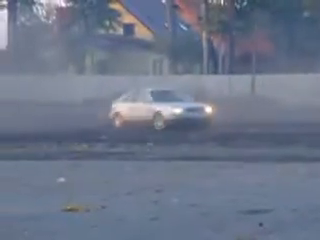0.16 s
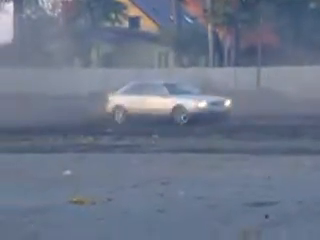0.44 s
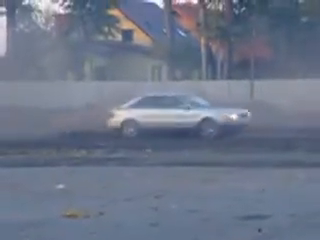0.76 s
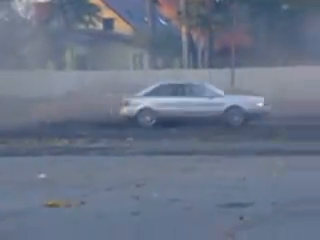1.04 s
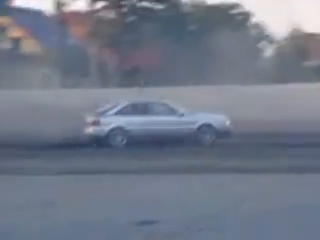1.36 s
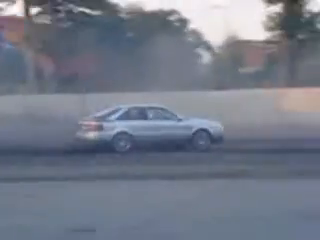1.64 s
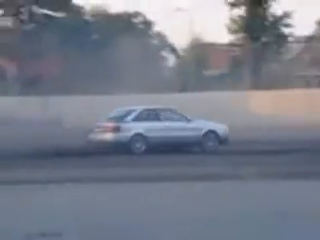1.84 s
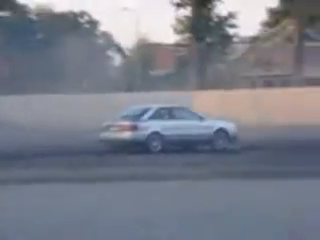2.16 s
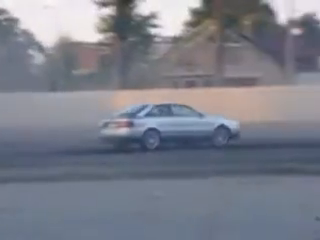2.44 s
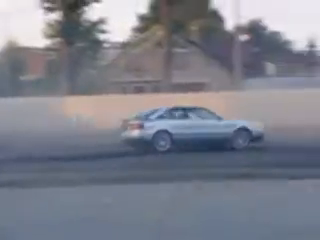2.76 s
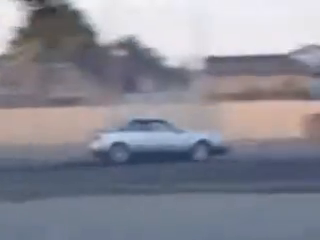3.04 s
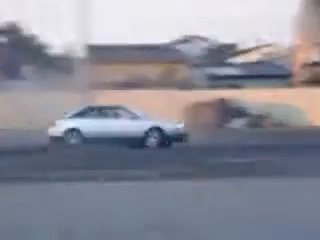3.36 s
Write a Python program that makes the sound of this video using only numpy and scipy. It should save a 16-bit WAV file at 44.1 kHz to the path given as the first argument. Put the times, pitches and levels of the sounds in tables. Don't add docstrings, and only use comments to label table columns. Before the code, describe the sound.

A car drifts on loose gravel outdoors, tyres roaring and ringing, stones hissing, engine revving in short stabs; a gentle wind boom midway, then stones knock the wheel arch. Mono camera microphone, fairly close.

```python
import sys
import numpy as np
from scipy import signal
from scipy.fft import rfft, irfft
from scipy.io import wavfile
from scipy.ndimage import uniform_filter1d

SR = 44100
rng = np.random.default_rng(int(sys.argv[2]) if len(sys.argv) > 2 else 0)


def waveform_to_disk(signal):
    frames = np.transpose(np.atleast_2d(signal))
    scaled = np.clip(frames, -1, 1) * 32767
    samples = np.round(scaled).astype(np.int16)
    wavfile.write(sys.argv[1], SR, samples)


def invert_db(level):
    return 10 ** (np.asarray(level, dtype=float) / 20)


N = 154350

# time_s, cycle_hz
ENGINE_SPEED = [(0, 36.4), (.18, 37.2), (.36, 39.4), (.5, 37.3), (.62, 38), (.74, 35.6), (.95, 35.7),
                (1.02, 37), (1.2, 39.4), (1.44, 32.6), (1.91, 37.4), (2.04, 33.2), (2.36, 35.2),
                (2.75, 34.5), (3.04, 40.8), (3.2, 40.4), (3.4, 43.6), (3.5, 43.6)]
# start_s, length_s, start_db, end_db, upper_orders_db
THROTTLE_STABS = [(.1, .3, -33, -30, 0), (.48, .15, -29, -25, -3), (.68, .15, -25, -22, -9),
                  (.87, .1, -26, -29, -5), (1.03, .19, -24, -24, 0), (1.38, .22, -25, -22, -8),
                  (1.56, .38, -24, -20, -1), (2.03, .25, -21, -21, -3), (2.35, .27, -23, -28, -2),
                  (2.85, .21, -21, -21, -3), (3.06, .11, -28, -28, 1), (3.22, .23, -30, -24, -18)]
# order, level_db
ENGINE_ORDERS = [(4, -4), (5, 0), (6, -5), (7, -2), (8, -1.5), (9, -6), (10, -2), (13, -4), (15, 0),
                 (16, -5)]
# pitch_hz, gain_db
EXHAUST_PIPE = [(140, -18), (162, -1), (195, -1), (226, -16), (258, -3), (305, 0), (350, -14), (520, -12)]
# time_s, scrub_db, ring_over_scrub_db, nearness_db
TYRE_PATH = [(0, -28, -1, 3), (.2, -29.5, 5.5, 3), (.5, -28, 2, 2.5), (.84, -28, 4, 1), (1.1, -29.5, -1, 2),
             (1.35, -29.5, 0.5, 0), (1.6, -32, 5.5, -1.5), (1.95, -30.5, 2, -1), (2.12, -30, 6.5, -1),
             (2.35, -32.5, 4.5, -1), (2.55, -35, 6.5, -1), (2.75, -35.5, 1.5, -2.5), (3.0, -30, -2, 0.5),
             (3.25, -30.5, 3.5, 2), (3.5, -30.5, 1, 1)]
# time_s, pitch_hz
TREAD_RING = [
    (0, 670),
    (.3, 655),
    (.8, 690),
    (1.1, 710),
    (1.4, 690),
    (1.9, 705),
    (2.4, 710),
    (2.85, 705),
    (3.2, 745),
    (3.5, 740),
]
# ratio_to_ring, width_hz, level_db
CARCASS_MODES = [(.79, 70, -9), (1, 90, 0), (1.14, 80, -5)]
# pitch_hz, density_db_per_hz
ROAR_SPECTRUM = [(190, -29), (330, -3), (448, -3.5), (672, 2), (920, -6), (1200, -7), (1790, -14),
                 (2000, -19), (3000, -37), (3900, -66), (6600, -120)]
# pitch_hz, density_db_per_hz
SPRAY_SPECTRUM = [(1290, -6), (2200, -1.5), (2740, -7.5), (6830, -12), (8710, -20), (9740, -27.5),
                  (12700, -57), (21400, -120)]
# start_s, level_db
ARCH_STONES = [
    (2.33, -32),
    (2.411, -28),
    (2.447, -35),
    (2.474, -31.5),
    (2.686, -42),
    (2.889, -34),
    (2.99, -31.5),
    (3.258, -34),
    (3.383, -32),
]
# time_s, surge_db
SCRUB_SURGES = [
    (0.982, 2),
    (1.229, 2),
    (1.601, 4),
    (1.888, 4.5),
    (1.948, 1.5),
    (2.349, 2),
]
# multiple, level_db
PARKED_HUM = [(2, -46), (3, -34.5), (4, -48), (5, -41), (8, -44)]
# pitch_hz, density_db_per_hz
RUMBLE_SPECTRUM = [(12, -62.5), (20, -17), (54, -29.5), (86, -9.5), (129, -16), (177, 0), (275, -2.5),
                   (400, -26.5), (520, -42), (880, -120)]
# time_s, level_db
WIND_GUSTS = [
    (0, -57),
    (.45, -58),
    (.5, -48),
    (.58, -58),
    (1.17, -55),
    (1.25, -41),
    (1.82, -40),
    (1.9, -58),
    (3.5, -54),
]


def evened(x):
    return x / np.sqrt(np.mean(x ** 2) + 1e-20)


def along(table):
    rows = np.transpose(table)
    return [np.interp(np.arange(N) / SR, rows[0], column) for column in rows[1:]]


def drift(rate_hz):
    noise = rng.standard_normal(N + SR)
    lowpass = signal.butter(2, rate_hz, fs=SR, output="sos")
    return evened(signal.sosfilt(lowpass, noise)[SR:])


def tone(hz):
    return np.sqrt(2) * np.cos(2 * np.pi * np.cumsum(hz) / SR)


def resonate(x, hz, width_hz):
    turn = np.exp(2j * np.pi * np.cumsum(hz * np.ones(len(x))) / SR)
    r = np.exp(-np.pi * width_hz / SR)
    return 2 * (turn * signal.lfilter([1 - r], [1, -r], x / turn)).real


def coloured(x, spectrum):
    hz = np.fft.rfftfreq(len(x), 1 / SR)
    f, db = np.transpose(spectrum)
    f = np.r_[f[0] * .7, f, f[-1] * 1.3]
    db = np.r_[db[0] - 40, db, db[-1] - 40]
    gain = invert_db(np.interp(np.log(hz + 1), np.log(f), db))
    return evened(irfft(rfft(x) * gain, len(x)))


def patchy(patchy_db, span_bins):
    real, imag, patches = rng.standard_normal((N // 64 + 5, 129, 3)).T
    patches = uniform_filter1d(patches, size=4, axis=0)
    patches = evened(uniform_filter1d(patches, size=span_bins, axis=1))
    cells = (real + 1j * imag) * invert_db(patchy_db * patches)
    return signal.istft(cells, nperseg=256, noverlap=192)[1][:N]


def throttle():
    open_s, close_s, upper_smooth_s, coast_db = .04, .06, .09, -36
    t = np.arange(N) / SR
    load = upper = invert_db(coast_db) * np.ones(N)
    for s, length, start_db, end_db, upper_db in THROTTLE_STABS:
        opening, closing = (t - s) / open_s + .5, (s + length - t) / close_s + .5
        gate = np.clip(np.minimum(opening, closing), 0, 1)
        push = gate * invert_db(start_db + (end_db - start_db) * np.clip((t - s) / length, 0, 1))
        load = np.maximum(load, push)
        upper = np.maximum(upper * (1 - gate), push * invert_db(upper_db))
    return load, uniform_filter1d(upper, size=round(upper_smooth_s * SR))


def engine():
    waver_db, jitter = .6, .001
    rasp_db, rasp_hz, rasp_width_hz = -21, 240, 160
    load, upper = throttle()
    cycle_hz = along(ENGINE_SPEED)[0]
    turns = np.cumsum(cycle_hz * (1 + jitter * drift(19))) / SR
    pipe_hz, pipe_db = np.transpose(EXHAUST_PIPE)
    orders = np.zeros(N)
    for k, db in ENGINE_ORDERS:
        pipe_gain_db = np.interp(np.log(k * cycle_hz), np.log(pipe_hz), pipe_db)
        level = np.sqrt(2) * invert_db(db + pipe_gain_db + waver_db * drift(5.5))
        orders += (upper if k > 5 else load) * level * np.cos(2 * np.pi * (k * turns + rng.random()))
    puffs = np.exp(-(5 * turns % 1) / .3) * rng.standard_normal(N)
    rasp = resonate(resonate(puffs, rasp_hz, rasp_width_hz), rasp_hz, rasp_width_hz)
    return orders + load * invert_db(rasp_db) * evened(rasp)


def tyres():
    scrub_db, ring_db, near_db = along(TYRE_PATH)
    grip_db, stones = scrub_surges(), gravel()
    grind = evened(patchy(patchy_db=0.5, span_bins=14))
    roar = invert_db(5.5) * coloured(grind + invert_db(-9.5) * stones, ROAR_SPECTRUM)
    roar += invert_db(-1.5 + ring_db) * tread_ring()
    spray_db = -38.5 + near_db + .15 * grip_db
    spray_db += 0.5 * drift(18) + .4 * drift(6.4)
    return invert_db(scrub_db + grip_db) * roar + invert_db(spray_db) * stone_spray(stones, near_db) + arch_knocks()


def scrub_surges():
    dip_db, dip_s, surge_s = -9, .01, .015
    t = np.arange(N) / SR
    grip_db = 0.43 * drift(27)
    for s, surge_db in SCRUB_SURGES:
        dip = dip_db * np.exp(-abs(t - s) / dip_s)
        surge = surge_db * np.exp(-abs(t - s) / surge_s)
        grip_db += np.where(t < s, dip, surge)
    return grip_db


def gravel():
    stones_per_s, spread_db = 1300, 2
    size = invert_db(spread_db * np.minimum(rng.exponential(1, N), 4))
    size = size * (rng.random(N) < stones_per_s / SR)
    crunch = rng.standard_normal(90) * np.exp(-np.arange(90) / 25)
    return evened(signal.oaconvolve(size, crunch)[:N])


def tread_ring():
    squeal_share, squeal_wander, swell_db = .55, .05, .5
    ring_hz = along(TREAD_RING)[0]
    rings = np.zeros(N)
    for ratio, width_hz, db in CARCASS_MODES:
        mode_hz = ratio * ring_hz
        mode = resonate(rng.standard_normal(N), mode_hz * (1 + 0.0066 * drift(2)), width_hz)
        mode = resonate(mode, mode_hz, 2 * width_hz)
        rings += invert_db(db + swell_db * drift(1.8)) * evened(mode)
    squeal = tone(ring_hz * (1 + squeal_wander * drift(23.8)))
    return evened((1 - squeal_share) * evened(rings) + squeal_share * squeal)


def stone_spray(stones, near_db):
    fizz_hz, lull_at_s, lull_s, lull_db = 6420, 1.755, .014, -12
    grit = evened(patchy(patchy_db=0.87, span_bins=8))
    spray = coloured(grit + invert_db(-23.5) * stones, SPRAY_SPECTRUM)
    hiss = signal.sosfiltfilt(signal.butter(2, fizz_hz, fs=SR, output="sos"), spray)
    lull = lull_db * np.exp(-((np.arange(N) / SR - lull_at_s) / lull_s) ** 2)
    return hiss + (spray - hiss) * invert_db(near_db + lull + 0.97 * drift(49))


def arch_knocks():
    t, hits = np.arange(0, .03, 1 / SR), np.zeros(N)
    attack = np.minimum(t / 0.0037, 1)
    for s, db in ARCH_STONES:
        at = round(s * SR)
        hits[at:at + len(t)] += invert_db(db - 60 * t / 0.087) * attack * rng.standard_normal(len(t))
    return signal.sosfilt(signal.butter(3, [3200, 7800], "band", fs=SR, output="sos"), hits)


def parked():
    idle_hz, jitter, waver_db, waver_hz, rumble_db = 34.5, .009, 2.2, 14, -29
    turns = np.cumsum(idle_hz * (1 + jitter * drift(5.6))) / SR
    hum = np.zeros(N)
    for k, db in PARKED_HUM:
        level = np.sqrt(2) * invert_db(db + waver_db * drift(waver_hz))
        hum += level * np.cos(2 * np.pi * (k * turns + rng.random()))
    return hum + invert_db(rumble_db) * coloured(rng.standard_normal(N), RUMBLE_SPECTRUM)


def wind():
    port_hz, width_hz, flutter_share = 52, 14, .75
    boom = resonate(rng.standard_normal(N), port_hz, width_hz)
    boom = evened(resonate(boom, port_hz, 2 * width_hz))
    flutter = tone(port_hz * (1 + .02 * drift(3.7)))
    return invert_db(along(WIND_GUSTS)[0]) * (flutter_share * flutter + (1 - flutter_share) * boom)


def scene():
    return (engine() + tyres() + parked() + wind())[None]


def roll_off(x):
    return signal.sosfilt(signal.butter(12, 12470, fs=SR, output="sos"), x)


def record(dry):
    edge_hz, image_hz, image_db = 9950, 12250, -31
    band_limit = signal.firwin(767, edge_hz, window=("kaiser", 10), fs=SR)
    x = signal.oaconvolve(dry, band_limit[None], "same")
    flipped = x * (-1.) ** np.arange(N)
    mirror = signal.sosfilt(signal.butter(12, image_hz, fs=SR, output="sos"), flipped)
    return roll_off(x + invert_db(image_db) * mirror)


dry = scene()
out = record(dry)
waveform_to_disk(out)
```